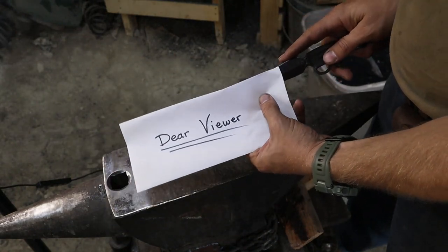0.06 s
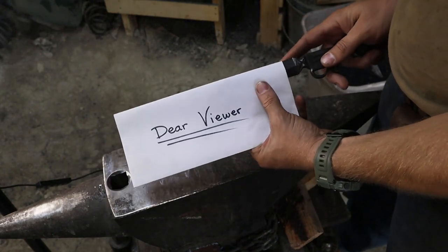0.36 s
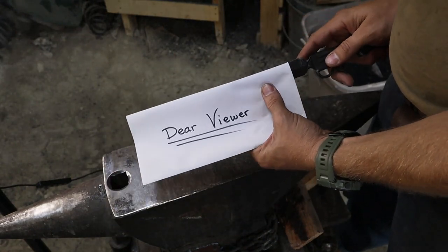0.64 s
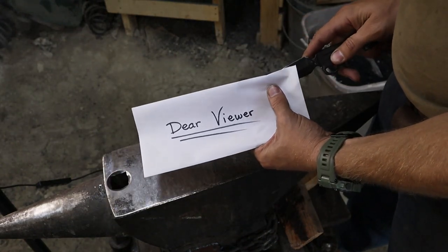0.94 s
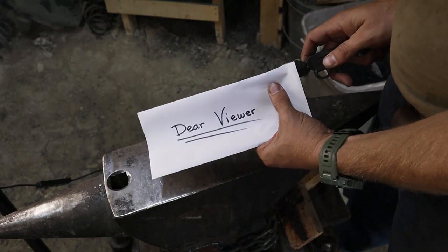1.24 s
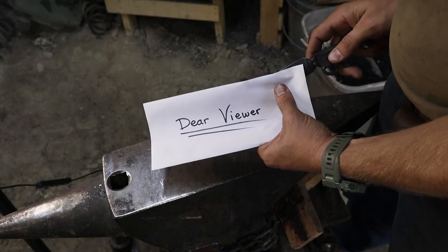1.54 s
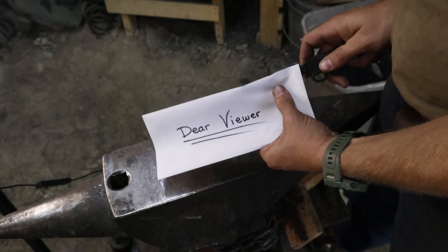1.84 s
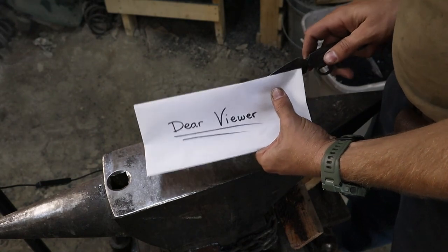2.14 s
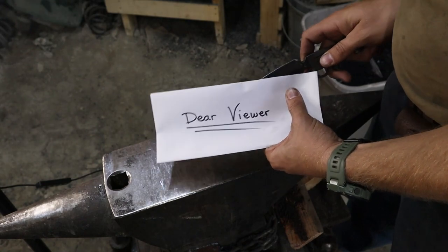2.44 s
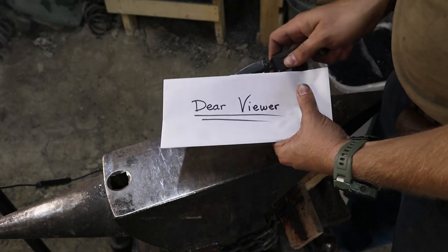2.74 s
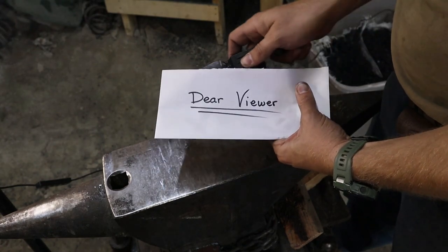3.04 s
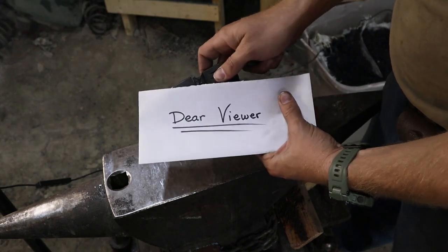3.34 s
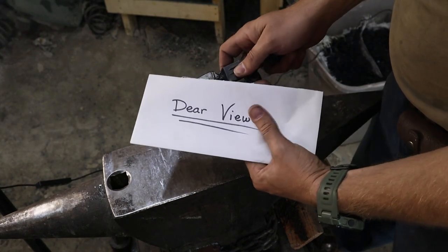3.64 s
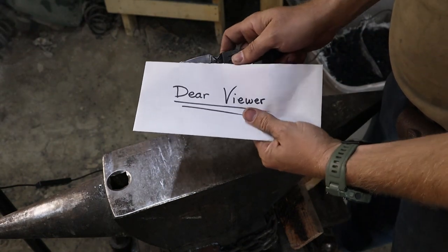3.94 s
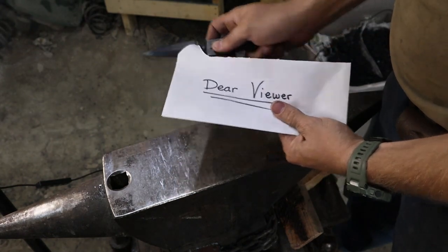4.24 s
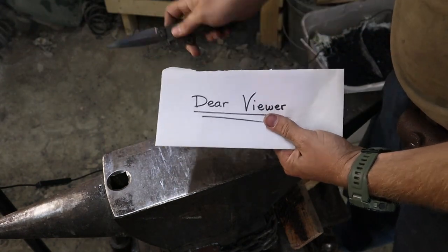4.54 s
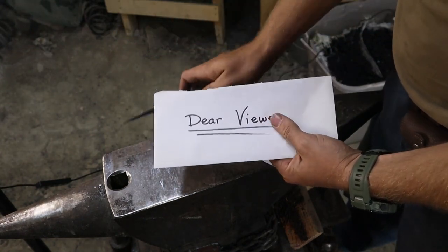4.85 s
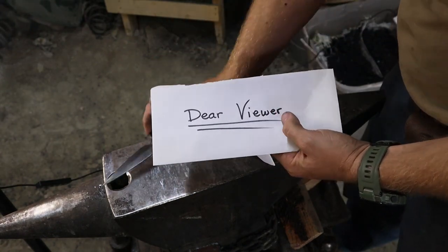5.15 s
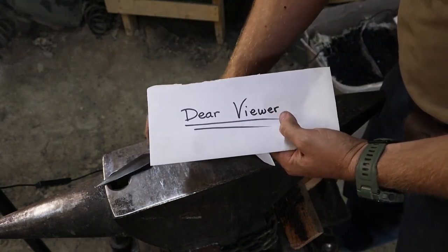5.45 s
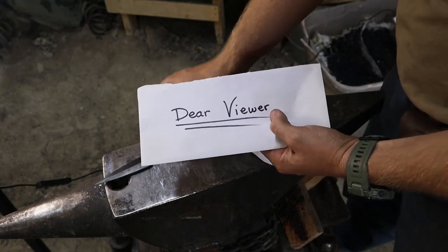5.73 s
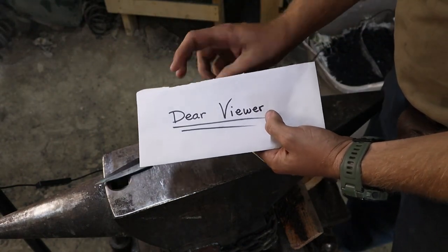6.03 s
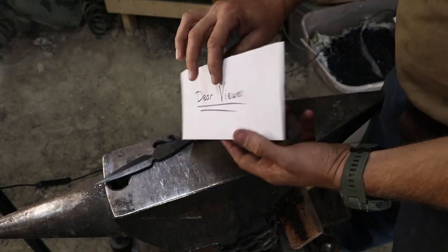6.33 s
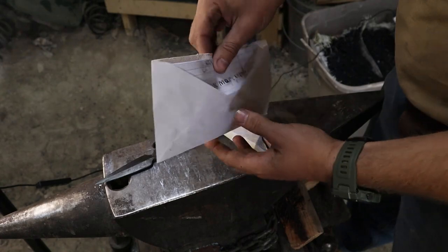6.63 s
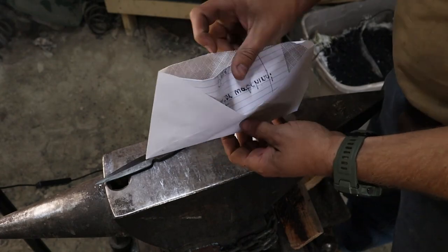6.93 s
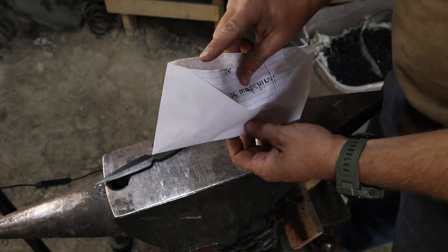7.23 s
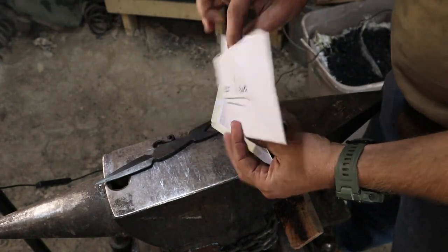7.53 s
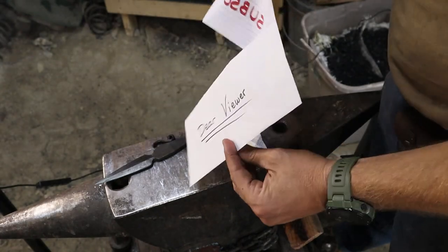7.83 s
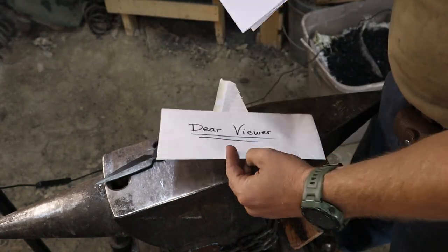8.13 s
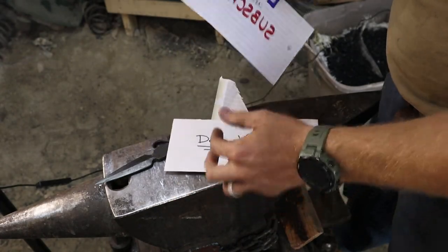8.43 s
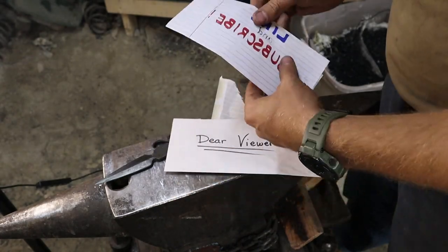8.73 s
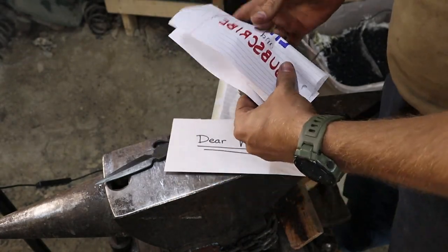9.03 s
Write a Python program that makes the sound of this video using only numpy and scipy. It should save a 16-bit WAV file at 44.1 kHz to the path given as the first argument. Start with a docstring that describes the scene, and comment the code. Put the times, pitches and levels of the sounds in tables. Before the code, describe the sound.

A knife slits a paper envelope with rustling and short rips, clinks down on an anvil, then the letter is pulled out and unfolded.

```python
"""Slitting an envelope

Hands work a knife under the flap of a paper envelope and slit it in several strokes, ending in one
fast rip. The paper hisses as it slides, snaps as it buckles and crackles as its fibres break. The knife
is laid on an anvil, where its steel modes clink and rattle to rest; then the letter is drawn out and
unfolded. A quiet workshop, heard by a close stereo microphone with automatic gain control."""
import sys
import numpy as np
from scipy import signal
from scipy.fft import rfft, irfft
from scipy.io import wavfile
from scipy.ndimage import uniform_filter1d, map_coordinates

SR = 44100
rng = np.random.default_rng(int(sys.argv[2]) if len(sys.argv) > 2 else 0)


def dump(signal):
    """Clip the signal to [-1, 1] and save it as 16-bit WAV at the path in sys.argv[1]."""
    limited = np.clip(np.atleast_2d(signal).T, -1, 1)
    pcm = np.round(limited * 32767).astype(np.int16)
    wavfile.write(sys.argv[1], SR, pcm)


N = 400428
TIME = np.arange(N) / SR

# The fold resists, then gives way in short cuts. Each row: start and end in seconds, fibre level in dB,
# sheet level in dB relative to the fibres, ring of the taut paper in Hz, ring level in dB.
CUTS = [(2.202, 2.214, -15.5, -5.5, 5850, -14), (2.227, 2.288, -17.5, -3.5, 10300, -32),
        (2.334, 2.341, -27.5, 16, 5800, -36), (2.35, 2.43, -33, -4, 2080, -46),
        (2.51, 2.576, -18, -6, 4750, -32), (2.577, 2.631, -22, -6.5, 4250, -28.5),
        (2.655, 2.663, -21.5, 9.5, 3980, -17), (2.706, 2.77, -24.5, -3, 3960, -30),
        (2.761, 2.841, -26, -4.5, 5570, -38), (2.848, 2.99, -24, -7.5, 5130, -37.5),
        (3.026, 3.116, -31, -2, 4600, -30.5), (3.092, 3.175, -20, -7, 9900, -38),
        (4.18, 4.215, -29, 1, 2700, -32)]
CUT_RISE_S, CUT_T60_S = 0.026, 0.0383
# The knife's modes. Each row: pitch in Hz, level in dB, free ring time (T60) in seconds,
# left minus right in dB, extra dB while the hand holds it.
KNIFE_MODES = [(815, -33.5, 1, -3, 8.5), (1147, -35.5, 0.34, 2, 25.5), (2052, -24.5, 0.6, -9.5, 7.5),
               (2634, -27, 0.62, 2, 10), (3403, -3, 0.19, 1.5, 0), (4210, -17, 0.16, -4, -8),
               (5280, -4.5, 0.39, 7.5, 1), (5700, -18.5, 0.16, 7.5, 13.5), (6260, -16.5, 0.49, -1.5, -16.5),
               (7230, -11.5, 0.19, -3, 5), (7400, 0, 0.29, 4.5, -7), (8230, -12, 0.28, -1, -20),
               (9843, -5.5, 0.33, -5, 5), (12651, -16, 0.24, 7, -0.5), (13400, -15.5, 0.22, 0, -5.5)]


def from_db(db):
    """Decibels to gain."""
    return np.exp(np.asarray(db) * np.log(10) / 20)


def rms_one(x):
    """The signal scaled to an RMS of 1."""
    return x / np.sqrt(np.mean(x ** 2) + 1e-20)


def at_hz(points, hz):
    """A curve of (Hz, value) points, read along a log frequency axis."""
    known_hz, values = np.transpose(points)
    return np.interp(np.log(np.maximum(hz, 1)), np.log(known_hz), values)


def band(x, low_hz, high_hz):
    """A gentle band-pass."""
    sos = signal.butter(2, [low_hz, min(high_hz, .45 * SR)], "band", fs=SR, output="sos")
    return signal.sosfilt(sos, x + 1e-18)


def coloured(x, colour, size=1024):
    """A minimum-phase EQ through the given (Hz, dB) points."""
    cepstrum = irfft(np.log(from_db(at_hz(colour, np.fft.rfftfreq(size, 1 / SR)))))
    cepstrum[1:size // 2] *= 2
    cepstrum[size // 2 + 1:] = 0
    return signal.oaconvolve(x, irfft(np.exp(rfft(cepstrum)))[None], axes=1)[:, :N]


def drift(per_s, size=N):
    """A random wander with a spread of about 1."""
    knots = rng.standard_normal(size // 64)
    return np.interp(TIME[:size] * per_s, np.arange(len(knots)), knots)


def swell(start, rise_s, end, t60):
    """An envelope that ramps up, holds until the end and dies away."""
    out, span = np.zeros(N), slice(round(start * SR), round((end + 2 * t60) * SR))
    fading_db = -60 * np.maximum(TIME[span] - end, 0) / t60
    out[span] = np.clip((TIME[span] - start) / rise_s, 0, 1) * from_db(fading_db)
    return out


def grains(per_s, spread_db):
    """Random tiny clicks, most weak and a few strong."""
    sizes = from_db(spread_db * np.minimum(rng.exponential(1, N), 4)) * rng.choice([-1, 1], N)
    return rms_one(sizes * (rng.random(N) < per_s / SR))


def two_ports(x, apart_db=-1.5, apart_hz=1500):
    """The left microphone port hears the source a little later; the two sides part in the treble."""
    between = np.roll(x, 1) + np.roll(x, 2)
    left = between / 2 + (between - x - np.roll(x, 3)) / 8   # 1.5 samples late
    own = signal.lfilter(*signal.butter(1, apart_hz, "high", fs=SR), x * rng.standard_normal((2, N)))
    return np.array([left, x]) + from_db(apart_db) * own


def room_tone(air_db=-46, hum_hz=75, hum_db=-60):
    """Steady dull air with a low, wavering hum."""
    # The air's spectrum. Each row: frequency in Hz, relative level in dB.
    colour = [(22, -11.5), (72, -8.5), (102, -10), (159, -13.5), (240, -12.5), (1180, -14), (3450, -24.5),
              (10900, -37.5), (15600, -56)]
    # How alike left and right are. Each row: frequency in Hz, likeness from 0 to 1.
    likeness = [(40, 1), (250, 0.23), (1000, 0), (4000, 0), (12000, 0)]
    hz = np.fft.rfftfreq(N, 1 / SR)
    mid, side = rfft(rng.standard_normal((2, N))) * from_db(at_hz(colour, hz))
    alike = np.clip(at_hz(likeness, hz), 0, 1)
    air = irfft(np.sqrt(1 + alike) * mid + np.sqrt(1 - alike) * side * [[1], [-1]], N)
    hum = band(rng.standard_normal(N), hum_hz - 4, hum_hz + 4)
    return from_db(air_db) * rms_one(air) + from_db(hum_db) * rms_one(hum)


def bending(x, depth_db, per_s, sharpness=0.85, count=8):
    """As the sheet bends, its resonances swell and sink one by one."""
    for hz in np.geomspace(400, 10000, num=count):
        resonance = signal.lfilter(*signal.iirpeak(hz, sharpness, fs=SR), x)
        x = x + (from_db(depth_db * drift(per_s)) - 1) * resonance
    return x


def rubbing(edge_s=0.017, flex_db=-5, catch_flex_db=9, crackle_db=-1, resting_db=-60):
    """Each slide is a hiss of surface fibres over the flexing sheet; a catching edge adds crackle."""
    # A hand slides paper over paper, skin or steel. Each row: start and end in seconds, level in dB,
    # treble lift in dB, crackle from 0 to 1.
    strokes = [(0, 0.029, -36, 5.5, 0.2), (0.065, 0.338, -47.5, 0, 0.54), (0.335, 0.44, -49.5, 4.5, 0.16),
               (0.537, 0.705, -44.5, -6.5, 0.3), (0.607, 0.63, -36, 6, 0.2), (0.804, 0.947, -38, 4.5, 0.4),
               (1.17, 1.322, -41, 1, 0), (1.385, 1.543, -44, 7.5, 0.62), (1.54, 1.613, -43, 11.5, 0.7),
               (1.676, 1.82, -40.5, 1, 0.4), (1.843, 1.948, -43.5, -5, 0.16), (3.217, 3.325, -48, 4, 0.54),
               (3.436, 3.739, -43.5, -2, 0.34), (3.772, 4.222, -43, -3, 0.37),
               (4.345, 4.428, -31.5, -2, 0.46), (4.586, 4.833, -53, -1, 0.52),
               (4.87, 4.985, -52, -0.5, 0.04), (6.26, 6.326, -44, -4.5, 0.73), (6.364, 6.383, -34, 10, 0.3),
               (6.388, 6.466, -48.5, 4.5, 0.3), (6.666, 6.934, -39, 0.5, 0), (6.888, 7.2, -41.5, -4, 0.26),
               (7.434, 7.533, -32.5, -1, 0.12), (7.52, 7.743, -36, 3.5, 0.32), (7.72, 7.854, -45.5, 4, 0),
               (7.838, 7.924, -41, 5.5, 0), (7.916, 7.978, -33, -1.5, .15), (7.968, 8.182, -44.5, -8, 0.24),
               (8.19, 8.307, -44.5, -7, 0.63), (8.344, 8.51, -45, -4, 0.1),
               (8.431, 8.455, -33.5, 6.5, 0.26), (8.713, 8.95, -49.5, 0.5, 0.32),
               (8.966, 9.093, -35.5, 4, 0.28)]
    # The tone of sliding paper. Each row: frequency in Hz, gain in dB.
    colour = [(59, -59.5), (100, -2.5), (777, 3.5), (1070, 11), (1530, 7), (2760, 5.5), (6570, -10),
              (10000, -6.5), (15600, -26)]
    power, crackle = np.zeros((3, N)), np.zeros(N)
    for start, end, db, treble_db, catching in strokes:
        span = slice(max(round((start - edge_s) * SR), 0), round((end + edge_s) * SR))
        inside_s = np.minimum(TIME[span] - start, end - TIME[span])
        speed = np.clip((inside_s / edge_s + 1) / 3, 0, 1) ** 3
        bands_db = db + np.array([[flex_db + catch_flex_db * catching], [0], [treble_db]])
        power[:, span] += from_db(bands_db) ** 2 * speed
        crackle[span] = catching
    hiss = grains(per_s=14000, spread_db=3.5) * np.sqrt(1 - crackle)
    ticks = grains(per_s=280, spread_db=3.0) * np.sqrt(crackle) * from_db(crackle_db)
    sheet = bending(coloured(two_ports(hiss + ticks), colour), depth_db=1.2, per_s=20)
    in_hand = np.interp(TIME, [4.9, 5.1, 6.2, 6.3], [1, 0, 0, 1])   # held paper rustles faintly
    flex, rub, fizz = np.sqrt(power + in_hand * from_db(resting_db) ** 2)
    return (from_db(0.5) * flex * rms_one(band(sheet, 97, 837))
            + from_db(1.0) * rub * rms_one(band(sheet, 1074, 2400))
            + from_db(2.44) * fizz * rms_one(band(sheet, 4810, 13200)))


def snaps(slowest_s=0.0018, quickening=0.31, flap_s=0.0092, flap_db=-15):
    """A crease flips in a short burst and the sheet flaps on; small creases snap higher and quicker."""
    # The paper buckles. Each row: time in seconds, relative level in dB, pitch in octaves above base_hz.
    buckles = [(0.118, -41, -1.6), (0.232, -34.5, 0.5), (0.286, -33, 1.45), (0.461, -32, 1.02),
               (0.493, -42, 0.67), (0.6, -21, 1.27), (0.676, -34.5, -0.33), (0.805, -23, 1.22),
               (0.835, -22, 1.32), (0.88, -25.5, 1.75), (0.897, -30, 1.8), (0.911, -26.5, 1.32),
               (0.927, -29, 2.2), (1.109, -46.5, -0.55), (1.161, -36, 0.66), (1.413, -30, 1.3),
               (1.434, -31, 1.8), (1.462, -31, 1.4), (1.575, -27, 1.45), (1.591, -32, 1.85),
               (1.612, -28, 2.3), (1.636, -36, 2.5), (1.766, -27, 1.4), (1.921, -40, 0.16),
               (2.123, -36.5, 1.7), (2.184, -22.5, 1.5), (2.192, -33, 1.9), (3.396, -39, 1.18),
               (3.596, -35.5, 0.21), (3.821, -39.5, 1.05), (3.855, -32, 0.81), (3.976, -36, -0.19),
               (3.999, -32.5, 0.77), (4.139, -34, 0.79), (4.215, -14, 1.08), (4.322, -19, 1.1),
               (4.586, -40.5, 0.56), (6.886, -33, 0.2), (6.993, -31, 0.45), (7.014, -35, -0.2),
               (7.034, -29, 0), (7.059, -27, 0.26), (7.08, -27.5, 0.95), (7.242, -30.5, 0.33),
               (7.447, -32, 1.3), (7.461, -26.5, 1.8), (7.471, -34, -0.22), (7.488, -28.5, 1.7),
               (7.52, -27, 1.7), (7.545, -29.5, 0.11), (7.566, -19.5, 1.1), (7.574, -28, 0.5),
               (7.689, -27, 2.1), (7.785, -36.5, 0.4), (8.024, -37.5, 0.7), (8.11, -42.5, 0.74),
               (8.205, -36, 0.8), (8.502, -36, 1.13), (8.952, -37, 0.66), (8.968, -30.5, 1.08)]
    # The tone of a snap. Each row: frequency in Hz, gain in dB.
    colour = [(80, -0.5), (200, 1.5), (500, 1), (900, 3), (1500, -7), (2500, -3), (5000, -5.5),
              (10000, -6.5), (13000, -12.5), (16000, -27.5)]
    base_hz, fall_db_per_octave, bass_lift_db = 2000, 10.5, 11
    out, age = np.zeros((2, N)), TIME[:3000]
    fibres = two_ports(rng.standard_normal(N))
    band_octaves = np.log2(np.array([500, 2000, 6500]) / base_hz)
    for s, db, octaves in buckles:
        span = slice(round(s * SR), round(s * SR) + len(age))
        # A snap favours the band nearest its pitch; the flapping sheet lifts its bass.
        bands_db = np.array([bass_lift_db, 0, 0]) - fall_db_per_octave * np.abs(band_octaves - octaves)
        shares = from_db(bands_db - bands_db.max())
        burst_s = slowest_s / 2 ** (quickening * max(octaves, 0))
        crack = fibres[:, span] * age / burst_s * np.exp(1 - age / burst_s)
        flap = crack + from_db(flap_db) * fibres[:, span] * np.exp(-age / flap_s)
        parts = band(flap, 97, 1220), -band(crack, 1290, 3540), band(crack, 4240, 12900)
        out[:, span] += from_db(db) * sum(share * rms_one(part) for share, part in zip(shares, parts))
    return from_db(-4.0) * coloured(out, colour)


def pops():
    """A stiff panel or crease pops through and rings for a few cycles of one resonance."""
    # Popping panels. Each row: time in seconds, pitch in Hz, envelope peak in dB, swell in seconds.
    panels = [(0.167, 665, -25.5, 0.00054), (0.234, 745, -21, 0.00045), (0.287, 860, -20.5, 0.0005),
              (0.462, 1070, -26, 0.0013), (0.491, 755, -22.5, 0.00054), (0.603, 620, -13.5, 0.00039),
              (0.704, 900, -25, 0.00072), (0.806, 10200, -5.5, 0.00018), (0.834, 4670, -15.5, 0.0006),
              (0.836, 300, -21.5, 0.00066), (1.577, 3060, -16, 0.00024), (2.725, 300, -23.5, 0.0014),
              (2.757, 480, -17, 0.00076), (3.908, 3960, -21, 0.00028), (3.908, 704, -26, 0.00087),
              (3.998, 2260, -21.5, 0.00071), (4.336, 2300, -10, 0.00072), (7.243, 1810, -14.5, 0.00036),
              (8.037, 2130, -16.5, 0.00049)]
    out, age = np.zeros((2, N)), TIME[:1500]
    lag_s = np.array([[.00003], [0]])   # the left port hears it later
    for s, hz, db, swell_s in panels:
        at = round(s * SR)
        envelope = from_db(db) * age / swell_s * np.exp(1 - age / swell_s)
        out[:, at:at + len(age)] += envelope * np.sin(2 * np.pi * hz * (age - lag_s))
    return out


def hollow_paper(sharpness=1.5):
    """Air in the envelope, or the stiff letter, rings briefly when the paper bulges or is laid down."""
    # Hollow resonances. Each row: start in seconds, pitch in Hz, level in dB, T60 in seconds.
    hollows = [(0.604, 895, -32.5, 0.059), (0.648, 480, -33, 0.33), (0.648, 198, -38, 0.39),
               (1.573, 2960, -24, 0.08), (4.323, 8050, -10, 0.033), (4.661, 445, -38, 0.19),
               (7.036, 163, -32, 0.14), (7.242, 1890, -37, 0.21), (7.463, 507, -31, 0.043),
               (8.034, 2000, -32, 0.072), (8.128, 476, -31.5, 0.27), (8.128, 186, -40, 0.37)]
    out, age = np.zeros((2, N + SR))[0], TIME[:SR // 3]
    for s, hz, db, t60 in hollows:
        ringing = signal.lfilter(*signal.iirpeak(hz, sharpness, fs=SR), rng.standard_normal(len(age)))
        at = round(s * SR)
        out[at:at + len(age)] += rms_one(band(ringing, hz / 2, hz * 2)) * from_db(db - 60 * age / t60)
    return out[:N]


def wandering_rings(rows, sharpness=8, wander=.07):
    """Catching fibres ring one resonance per row; its pitch wanders as the blade moves on."""
    out, breaks = np.zeros((2, N)), two_ports(grains(per_s=2500, spread_db=1.0))
    read_speed = 1 + wander * drift(per_s=30)
    for start, end, hz, db in rows:
        span = slice(round(start * SR), round((end + CUT_T60_S) * SR))
        catches = breaks[:, span.start:span.start + SR // 2]
        ringing = signal.lfilter(*signal.iirpeak(hz, sharpness, fs=SR), catches)
        positions = np.cumsum(read_speed[span])
        gliding = np.array([map_coordinates(port, [positions], order=3) for port in ringing])
        envelope = from_db(db) * swell(start, CUT_RISE_S, end, CUT_T60_S)[span]
        out[:, span] += envelope * rms_one(band(gliding, hz * .75, hz / .75))
    return out


def ringing_fold(pocket_hz=1060, overtone_ratio=1.9, overtone_db=-10):
    """The blade rings the pocket of air inside the fold and the taut paper ahead of it."""
    # The blade scrapes inside the fold. Each row: start and end in seconds, level in dB.
    scrapes = [(1.19, 1.304, -48), (1.69, 1.786, -43.5), (2.18, 2.29, -45), (2.33, 2.423, -33.5),
               (2.52, 2.61, -35.5), (2.65, 2.673, -40), (2.73, 2.832, -37.5), (3.11, 3.175, -39)]
    taut = [(start, end, hz, db) for start, end, _, _, hz, db in CUTS]
    air = [(start, end, pocket_hz * ratio, db + partial_db) for start, end, db in scrapes
           for ratio, partial_db in ((1, 0), (overtone_ratio, overtone_db))]
    return wandering_rings(taut) + wandering_rings(air)


def tearing(sheet_gain, fibre_gain, colour, per_s, spread_db, judder_db):
    """Fibres break in quick uneven bunches; each break also shakes the sheet."""
    breaks = grains(per_s, spread_db) * from_db(judder_db * drift(per_s=260))
    paper = bending(coloured(two_ports(breaks), colour), depth_db=3.3, per_s=30, sharpness=4, count=9)
    return sheet_gain * rms_one(band(paper, 100, 2300)) - fibre_gain * rms_one(band(paper, 2700, 18000))


def slitting(glide_sheet_db=-3, glide_fibre_db=-3.5, trim_db=-2):
    """The blade glides along inside the fold and cuts it in jerks."""
    # The level curve of the glide. Each row: time in seconds, relative level in dB.
    glide_curve = [(2.1, -53), (2.176, -28), (2.342, -32), (2.664, -27), (2.732, -43), (3.014, -30.5),
                   (3.182, -36), (3.26, -41.5)]
    # The tone of paper being cut. Each row: frequency in Hz, gain in dB.
    colour = [(59, -48), (100, -15), (276, -7), (542, -7), (1000, -3), (1600, -11.5), (2100, -9),
              (2600, -7.5), (3950, -6), (7000, -4), (9000, -1.5), (10400, 2.5), (12300, -8), (15600, -19.5)]
    glide_db = np.interp(TIME, *np.transpose(glide_curve), left=-140, right=-140)
    sheet_power = from_db(glide_db + glide_sheet_db) ** 2
    fibre_power = from_db(glide_db + glide_fibre_db) ** 2
    for start, end, db, sheet_db, _, _ in CUTS:
        cut_power = (from_db(db) * swell(start, CUT_RISE_S, end, CUT_T60_S)) ** 2
        sheet_power += cut_power * from_db(sheet_db) ** 2
        fibre_power += cut_power
    sheet, fibres = np.sqrt(sheet_power), np.sqrt(fibre_power)
    return from_db(trim_db) * tearing(sheet, fibres, colour, per_s=4500, spread_db=1.5, judder_db=2.4)


def ripping(start_s=4.213, end_s=4.336, rise_s=.04, sag_db_per_s=18, sheet_db=-23.5, fibre_db=-12):
    """The last of the fold rips in one easing pull; the sheet shakes on after the fibres have parted."""
    # The tone of the fast rip. Each row: frequency in Hz, gain in dB.
    colour = [(59, -88), (100, -17), (341, -10), (850, -6), (1400, -11), (3870, -4.5), (7000, -2),
              (10000, 4), (11500, -6.5), (14100, -15), (15600, -44)]
    pull_db = -sag_db_per_s * np.clip(TIME - start_s - rise_s, 0, end_s - start_s)
    sheet = from_db(sheet_db + pull_db) * swell(start_s, rise_s, end_s, t60=0.28)
    fibres = from_db(fibre_db + pull_db) * swell(start_s, rise_s, end_s, t60=0.037)
    return tearing(sheet, fibres, colour, per_s=14000, spread_db=1.6, judder_db=1.2)


def blade(size, wobble_rad, per_s, buzz_db=2.2):
    """The blade's undamped modes at both ports; rocking on the anvil shifts each one's level and pitch."""
    hz, _, _, pan_db, _ = np.transpose(KNIFE_MODES)
    sides = from_db(np.array([pan_db, -pan_db]) / 2)[:, :, None]
    lag_s = np.array([0, .00004])[:, None, None]
    rocking = np.array([drift(per_s, size=2 * size) for _ in hz]).reshape(len(hz), 2, -1)
    phase = 2 * np.pi * hz[:, None] * (TIME[:size] - lag_s) + wobble_rad * rocking[:, 1]
    return sides * from_db(buzz_db * rocking[:, 0]) * np.sin(phase)


def knife_on_anvil(release_s=5.58, focus_db=9, contact_s=0.00033, ring_kept=0.67):
    """Each touch clicks, checks the blade's ring and starts it afresh; chatter keeps the modes going."""
    # Steel meets the anvil. Each row: time in seconds, strength in dB, most excited frequency in Hz,
    # share of the free ring time.
    clinks = [(5.3334, -11, 4320, 0.2), (5.35, -21.5, 4330, 0.35), (5.5909, -12.5, 3400, 1),
              (5.6128, -8, 6230, 0.76), (5.618, -2, 7400, 1), (5.629, -10.5, 5180, 0.34),
              (5.6353, -7, 9800, 0.9), (5.657, -8.5, 5260, 1), (5.673, -7, 7860, 0.8),
              (5.708, -7.5, 7330, 0.86), (5.724, -9, 7300, 0.7), (5.757, -12.5, 5700, 0.78)]
    # The blade slides or rocks. Each row: start and rise in seconds, level in dB, T60 in seconds.
    chatter = [(5.335, 0.0096, -28, 0.18), (5.44, 0.047, -29, 0.29), (5.595, 0.16, -14, 0.27)]
    tick_s, tick_db, grit_db = .003, -5, -13
    hz, mode_db, t60, _, held_db = np.transpose(KNIFE_MODES)
    age, out = TIME[:SR // 2], np.zeros((2, N))
    span = slice(round((clinks[0][0] - .01) * SR), round(clinks[-1][0] * SR) + len(age))
    # Steel pressed on steel rings hoarsely, a free blade nearly clean.
    pressed = blade(len(age), wobble_rad=1.0, per_s=260)
    loose = blade(len(age), wobble_rad=.2, per_s=60)
    fading_db = -60 * age / t60[:, None]
    touching = 1 - np.exp(-age / contact_s)

    def ring(in_hand, strength_db, ring_share):
        """The decaying modes, summed; in the hand the knife clanks lower."""
        modes, level_db = (pressed, mode_db + held_db) if in_hand else (loose, mode_db)
        return np.sum(modes * from_db((level_db + strength_db)[:, None] + fading_db / ring_share), axis=1)

    for s, db, best_hz, ring_share in clinks:
        # The contact point favours the modes within half an octave of best_hz.
        off_focus = np.minimum(np.abs(np.log2(hz / best_hz)) * 2, 1)
        clink = ring(s < release_s, db - focus_db * off_focus, ring_share)
        tick = band(rng.standard_normal((2, len(age))) * np.exp(-age / tick_s), 3500, 10600)
        after = slice(round(s * SR), round(s * SR) + len(age))
        out[:, after] *= 1 - (1 - ring_kept) * touching
        out[:, after] += clink * touching + from_db(db + tick_db) * tick
    contact = sum(from_db(db) * swell(s, rise_s, s + rise_s, fade_s) for s, rise_s, db, fade_s in chatter)
    taps, held = grains(per_s=8700, spread_db=4.0) * contact, TIME < release_s
    for scraping, in_hand, ring_share in ((taps * held, True, 0.11), (taps * ~held, False, 0.23)):
        response = ring(in_hand, 0, ring_share)
        rattle = signal.oaconvolve(scraping[None, span], response / np.linalg.norm(response), axes=1)
        out[:, span] += rattle[:, :span.stop - span.start]
    out[:, span] += from_db(grit_db) * band(two_ports(taps)[:, span], 4200, 6100)
    steel_band = signal.cheby1(7, .5, [750, 13200], "band", fs=SR, output="sos")
    out[:, span] = signal.sosfilt(steel_band, out[:, span])
    return out


def to_the_right(x):
    """The sheet is held to the right and radiates that way mostly in the midrange."""
    # The paper's stereo balance. Each row: frequency in Hz, left minus right in dB.
    balance = [(100, -2), (400, -2), (1000, -3.5), (2200, -4), (4200, -1.8), (9000, -1.5)]
    return np.vstack([coloured(port[None], [(hz, side * db / 2) for hz, db in balance])
                      for port, side in zip(x, (1, -1))])


def workshop_reverb(x, wet_db=-14, t60=0.33, build_s=0.0076):
    """The workshop answers with a short diffuse tail."""
    age = TIME[:SR // 2]
    noise = rng.standard_normal((2, len(age))) * np.clip(age / build_s, 0, 1)
    fading_db = -60 * age / t60
    body = band(noise, 134, 5100) * from_db(fading_db)
    bright = band(noise, 2960, 14000) * from_db(fading_db * 0.94)
    tail = body - 0.31 * bright
    tail /= np.linalg.norm(tail, axis=1, keepdims=True)
    return from_db(wet_db) * signal.oaconvolve(x, tail, axes=1)[:, :N]


def scene():
    """Paper and knife close up, over the workshop's reverb and room tone."""
    tears = slitting() + ripping()
    paper = to_the_right(tears + rubbing() + ringing_fold() + snaps() + pops() + hollow_paper())
    near = paper + knife_on_anvil()
    return near + workshop_reverb(near) + room_tone()


def record(dry, threshold_db=-11, release_db_per_s=24, reaction_s=.043, cutoff_hz=16200):
    """Gain control ducks just after a loud passage and recovers slowly; peaks clip and the top is cut."""
    power = uniform_filter1d(dry ** 2, size=440).max(axis=0)
    level_db = 10 * np.log10(np.maximum(power, 1e-12))
    over_db = np.clip(3 * (level_db - threshold_db), 0, 8.5)
    held_db = np.maximum.accumulate(over_db + release_db_per_s * TIME) - release_db_per_s * TIME
    duck_db = np.interp(TIME - reaction_s, TIME, uniform_filter1d(held_db, size=128))
    overloaded = np.clip(dry * from_db(-duck_db), -.88, .88)
    return signal.sosfilt(signal.cheby2(16, 60, cutoff_hz, fs=SR, output="sos"), overloaded)


dry = scene()
out = record(dry)
dump(out)
```